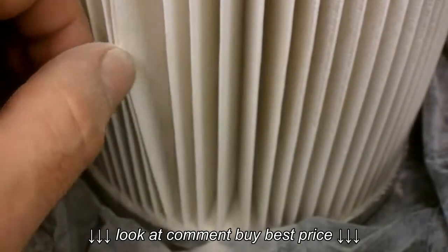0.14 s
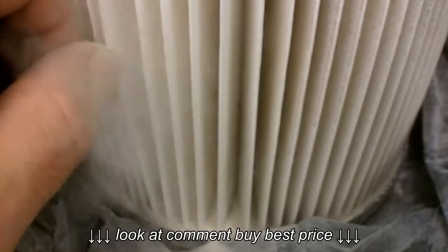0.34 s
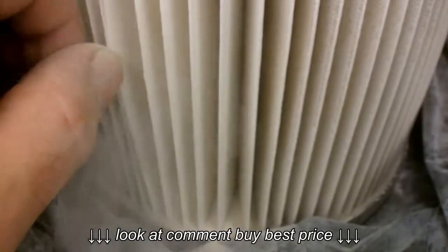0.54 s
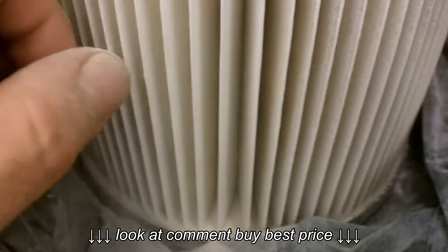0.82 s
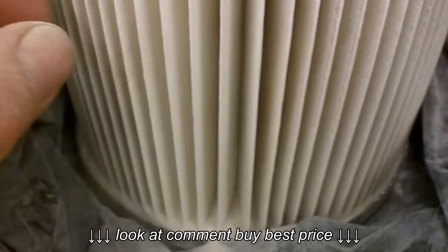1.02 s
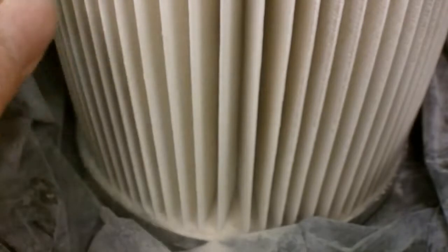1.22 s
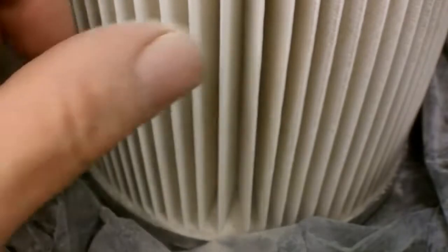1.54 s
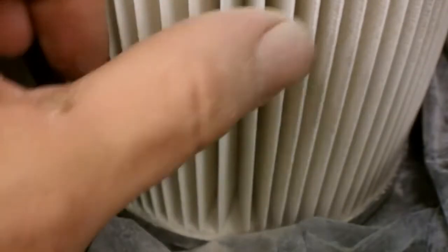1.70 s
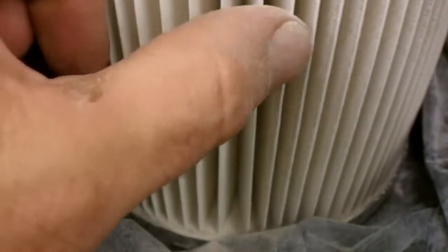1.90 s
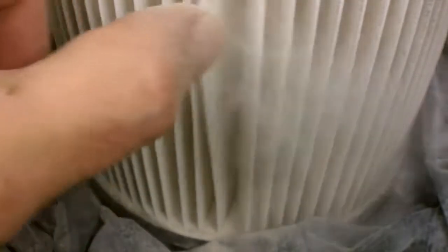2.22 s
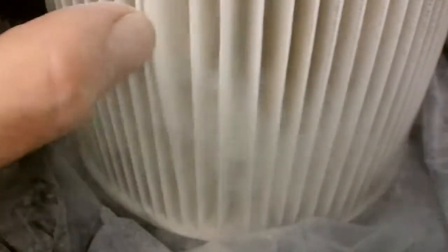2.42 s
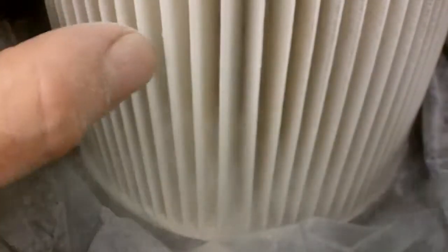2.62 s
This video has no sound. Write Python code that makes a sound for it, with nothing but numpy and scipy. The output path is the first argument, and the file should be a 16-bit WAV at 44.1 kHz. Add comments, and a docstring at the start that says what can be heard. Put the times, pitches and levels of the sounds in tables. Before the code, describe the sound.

Sharp snaps of a thumb flicking stiff filter pleats, over a faint workshop hum.

```python
"""Over a workshop's hum and air noise come a faint tick, a short rub and one loud snap.
A thumb is dragging across the stiff pleats of a dusty cartridge filter. Skin rubs and the nail
ticks on the folds, then five more snaps come in a quick run near the end. Each pleat springs free
with a crack and sets the hollow cartridge thumping. The loudest snaps clip harshly."""
import sys
import numpy as np
from scipy import signal
from scipy.fft import rfft, irfft
from scipy.io import wavfile
from scipy.ndimage import uniform_filter1d

SR = 44100
rng = np.random.default_rng(int(sys.argv[2]) if len(sys.argv) > 2 else 0)


def wav_record(signal):
    """Record a signal, one row per channel, as 16-bit PCM in the file named by sys.argv[1]."""
    frames = np.transpose(np.atleast_2d(signal))
    bounded = np.clip(frames, -1, 1)
    # unit amplitude maps onto the largest positive 16-bit level
    quanta = np.round(bounded * 32767).astype(np.int16)
    wavfile.write(sys.argv[1], SR, quanta)


N = 121275


def amp(db):
    """Turn decibels into a number to multiply by."""
    return 10 ** (np.asarray(db) / 20)


def unit_level(x):
    """Scale a signal to an average (rms) level of 1."""
    return x / np.sqrt(np.mean(x ** 2) + 1e-20)


def noise(colour, size, patchy_db=0.):
    """Noise shaped by rows of (pitch_hz, level_db); patchy_db makes it flicker."""
    real, imag, patches = rng.standard_normal((size // 128 + 6, 257, 3)).T
    patches = unit_level(uniform_filter1d(uniform_filter1d(patches, size=6, axis=0), size=12, axis=1))
    hiss = signal.istft((real + 1j * imag) * amp(patchy_db * patches), nperseg=512, noverlap=384)[1]
    hz, db = np.transpose(colour)
    curve_db = np.interp(np.log(np.fft.rfftfreq(size, 1 / SR) + 1), np.log(hz), db, -90, -120)
    return unit_level(irfft(rfft(hiss[:size]) * amp(curve_db), size))


def grit(size, pitch_hz, width_hz):
    """Noise that rings loosely around one pitch."""
    resonance = signal.iirpeak(pitch_hz, pitch_hz / width_hz, SR)
    return unit_level(signal.lfilter(*resonance, rng.standard_normal(size)))


def wander(fastest_hz):
    """A slow, random wobble."""
    t = np.arange(N) / SR
    rates_hz = np.geomspace(.3, fastest_hz, 12)
    return unit_level(sum(np.sin(2 * np.pi * (hz * t + rng.random())) / np.sqrt(hz) for hz in rates_hz))


# Faint hiss that differs between left and right: pitch_hz, level_db
STEREO_HISS = [(12, -35), (20, -2.5), (32, -15), (738, -62.5), (825, -43.5), (1330, -47.5), (16000, -67)]
def near_mono(mix, lag_samples=.18):
    """Left and right are almost alike, differing slightly in the treble and by a faint hiss."""
    side = lag_samples / 2 * np.gradient(mix) + amp(-86.5) * noise(STEREO_HISS, N)
    return mix + side * np.array([[1], [-1]])


# The rumble of air in the room: pitch_hz, level_db
ROOM_AIR = [(14, -42.5), (24, 8), (32, -4), (69, -3), (91, -22), (123, -2), (190, -16.5), (217, -9),
            (285, -13), (611, -19.5), (720, -24), (825, -21), (945, -25.5), (2960, -36.5), (16000, -71)]
# The tones of the machines: pitch_hz, level_db
MACHINE_HUM = [(118.4, -57.5), (242.2, -62.5), (339.1, -70), (818.3, -61), (1319, -79), (1637, -82),
               (1798, -81.5), (2880, -82.5)]
def workshop(waver_db=4.5):
    """Air rumbles while machines hum, wavering in loudness and slightly in pitch."""
    drifting_s = np.cumsum(1 + .0018 * wander(1.7)) / SR
    hum = np.zeros(N)
    for hz, db in MACHINE_HUM:
        peak = np.sqrt(2) * amp(db + waver_db * wander(4.5))
        hum += peak * np.sin(2 * np.pi * (hz * drifting_s + rng.random()))
    return hum + amp(-51.5) * noise(ROOM_AIR, N, patchy_db=1)


# The low, middle and high parts of the rubbing noise: pitch_hz, level_db
RUB_LOW = [(200, -23.5), (500, -7.5), (750, 1.5), (1200, -3), (2000, -30)]
RUB_MIDDLE = [(900, -33), (1500, -1.5), (2800, 4.5), (4600, -3.5), (5400, -27)]
RUB_TREBLE = [(5000, -37.5), (6200, 8.5), (8000, 1.5), (11000, -7), (16000, -30)]
# Strokes of the thumb. Here and below, a fade is the time a sound takes to drop by 60 dB.
# start_s, hold_s, fade_s, level_db, low_db, treble_db
SKIN_RUBS = [(0, 0.012, .05, -60, 4.5, -11), (.148, 0.027, .1, -55.5, 10, -14.5),
             (0.18, 0.064, .03, -47, 3.5, -17.5), (.232, .03, 0.42, -52, 8, -21.5),
             (0.638, 0.0077, .4, -66, 7, -12), (0.832, 0.12, 0.13, -64.5, -24, -6),
             (0.937, .1, .3, -61.5, -2, -11.5), (1.211, .05, .3, -71.5, 7.5, -6),
             (1.65, 0.051, .2, -70, 7, -9.5), (1.769, 0.027, .1, -65, 2, -18),
             (1.828, .04, .2, -64.5, 0, -15.5), (1.888, 0.075, .2, -69, 3, -13),
             (2.04, 0.2, .05, -53, 10, -17.5), (2.145, 0.047, .05, -55.5, 9, -11),
             (2.185, .03, .05, -36.5, -3, -22), (2.253, 0.048, .05, -45, 3, -18),
             (2.327, 0.049, .05, -51.5, 4, -14.5), (2.364, .016, .05, -47, 8.5, -9),
             (2.413, 0.015, .05, -48.5, -8, -11.5), (2.454, .04, .1, -67, -2, -9)]
def skin_rub(start_s, hold_s, fade_s, level_db, low_db, treble_db):
    """Skin catches and slips unevenly on the pleats, making a dry, grainy noise."""
    t = np.arange(SR // 2) / SR
    low, middle, high = (noise(part, len(t), patchy_db=1.5) for part in (RUB_LOW, RUB_MIDDLE, RUB_TREBLE))
    rise = np.minimum(t / (.35 * hold_s), 1)
    fade = amp(-60 * np.maximum(t - hold_s, 0) / fade_s)
    catches_db = 2 * unit_level(uniform_filter1d(rng.standard_normal(len(t)), size=180))
    friction = middle + amp(low_db) * low + amp(treble_db) * high
    return start_s, amp(level_db + catches_db) * rise * fade * friction


# The bright hiss in each tick and crack: pitch_hz, level_db
CLICK_HISS = [(1000, 16), (4000, 2.5), (7000, -8.5), (11000, -16), (15000, -38)]
# Small ticks of the nail: start_s, level_db, pitch_hz, hiss_db, fade_s
NAIL_TICKS = [(.036, -38.5, 2820, -18, 0.013), (.108, -55.5, 3020, 2.5, 0.013), (.137, -56, 3200, 0, 0.021),
              (0.254, -47, 4200, -8, 0.012), (.2645, -60, 7000, -6, 0.0097), (0.644, -48, 2920, -11, 0.045),
              (.645, -55, 1250, -22, .07), (0.75, -60.5, 2080, -16.5, 0.075),
              (0.922, -37.5, 3900, -9, 0.011), (1.0297, -31, 2200, -3.5, 0.012),
              (1.0695, -46, 2900, 5, 0.014), (1.075, -47, 1300, -5, 0.014), (2.0275, -51, 2980, 2, 0.019),
              (2.0457, -50.5, 3000, -10, 0.038), (2.153, -53, 4800, -5, .015)]
def nail_tick(start_s, level_db, pitch_hz, hiss_db, fade_s):
    """The nail clips the edge of a pleat, making a tiny burst of grit and hiss."""
    t = np.arange(4000) / SR
    burst = grit(len(t), pitch_hz, width_hz=900) + amp(hiss_db) * noise(CLICK_HISS, len(t))
    rise = np.minimum(t / .0008, 1)
    return start_s, rise * amp(level_db - 60 * t / fade_s) * burst


# Extra tones of the hollow cartridge: times_thump_pitch, level_db, fade_s
CARTRIDGE_TONES = [(0.838, -22, 0.32), (0.972, -25, .18), (1.899, -20, 0.035)]
# The tones of one pleat: times_pleat_pitch, level_db, fade_s
PLEAT_TONES = [(0.802, -14.5, 0.026), (1.002, -0.5, 0.02), (1.01, -34.5, 0.26), (1.198, -9.5, 0.041),
               (1.351, -17, 0.037), (1.701, -12, 0.027), (2.2, -14.5, 0.022), (2.702, -12, 0.02),
               (3.1, -19, .02)]
PULL_S = .001831  # how long a pleat is pulled before it lets go
def thump_and_ring(t, thump_hz, thump_fade_s, knock_db, pleat_hz, ring_db):
    """A pleat is pulled inwards and lets go: the hollow cartridge thumps and the pleat rings."""
    free_s = np.maximum(t - PULL_S, 0)
    tones = [(thump_hz, 0, thump_fade_s), (296, knock_db, .046)]  # the thump and a higher knock
    tones += [(thump_hz * ratio, db, fade_s) for ratio, db, fade_s in CARTRIDGE_TONES]
    for ratio, db, fade_s in PLEAT_TONES:
        detune = 1 + .018 * rng.standard_normal()
        tones.append((pleat_hz * ratio * detune, db + ring_db, fade_s))
    ring = np.zeros(len(t))
    for hz, db, fade_s in tones:
        phase = rng.standard_normal() * np.clip(hz / 1000 - .8, 0, np.pi)  # high tones start out of step
        swell = 1 - np.exp(-free_s / .0012) / 2 if hz > 400 else 1  # the pleat follows the cartridge
        ring -= swell * amp(db - 60 * free_s / fade_s) * np.cos(2 * np.pi * hz * (t - PULL_S) + phase)
    pull = np.sin(np.pi / 2 * np.minimum(t / PULL_S, 1)) ** 2
    bass_cut = signal.butter(3, 70, "high", fs=SR)  # deep bass is cut from the thump
    return signal.lfilter(*bass_cut, pull * ring)


# Pleats snapping free:
# release_s, level_db, thump_hz, thump_fade_s, knock_db, pleat_hz, ring_db, crack_db, crack_hz
PLEAT_SNAPS = [(.2152, 1, 185.8, .08, -15, 687.4, -0.5, -7, 2702),
               (2.1291, 0.5, 203.5, 0.057, -3.5, 633, -3.5, -14, 1600),
               (2.213, 2, 192.5, 0.053, -10.5, 587, 1.5, -10, 1484),
               (2.2975, -0.5, 195.7, .06, -16, 649.4, 4, -7.5, 2620),
               (2.3784, -2, 187.1, 0.052, -12, 600, -4.5, -15.5, 2606),
               (2.4439, -5, 199, 0.06, -21, 660, -7, -18, 2614)]
def pleat_snap(release_s, level_db, thump_hz, thump_fade_s, knock_db, pleat_hz, ring_db,
               crack_db, crack_hz):
    """A pleat springs free: a sharp crack and a dying rustle ride on top of the thump."""
    t = np.arange(SR // 2) / SR
    free_s = np.maximum(t - PULL_S, 0)
    body = thump_and_ring(t, thump_hz, thump_fade_s, knock_db, pleat_hz, ring_db)
    crunch = amp(-8) * grit(len(t), crack_hz, width_hz=540)
    ping = np.sin(2 * np.pi * (crack_hz * t + rng.random()))
    hiss = noise(CLICK_HISS, len(t)) * amp(-4.5 - 60 * free_s / .012)
    crack = (crunch + ping) * amp(-60 * free_s / .018) + hiss
    rise = np.clip((t - PULL_S) / .0012 + .5, 0, 1)
    return release_s - PULL_S, amp(level_db) * (body + rise * (amp(crack_db) * crack + snap_rustle(t)))


# The rustle that trails each snap: pitch_hz, level_db
SNAP_RUSTLE = [(300, 10.5), (700, 9), (1500, 0.5), (3000, -16), (5000, -30.5), (9000, -44.5), (16000, -54)]
def snap_rustle(t, fade_s=.17):
    """A soft, low rustle dies away after the pleat lets go."""
    return noise(SNAP_RUSTLE, len(t), patchy_db=1.5) * amp(-30 - 60 * t / fade_s)


def scene():
    """Lay every snap, tick and rub over the workshop; left and right hear nearly the same."""
    mix = workshop()
    for source, table in ((pleat_snap, PLEAT_SNAPS), (nail_tick, NAIL_TICKS), (skin_rub, SKIN_RUBS)):
        for row in table:
            start_s, sound = source(*row)
            part = mix[round(start_s * SR):][:len(sound)]
            part += sound[:len(part)]
    return near_mono(mix)


# A steady shift of the wave away from zero, left then right: share_of_full_scale
CHANNEL_OFFSET = [
    [.0194],
    [.0307],
]
def record(dry, threshold_db=-32, cut_share=.13, react_s=.025, top_hz=16400):
    """An automatic volume control dips just after each snap; the loudest clip; top treble is cut."""
    power = signal.lfilter(np.ones(400) / 400, 1, np.clip(dry[0], -1, 1) ** 2)
    fall_db = np.arange(N) * 57.5 / SR
    held_db = np.maximum.accumulate(10 * np.log10(power + 1e-12) + fall_db) - fall_db  # peaks sink slowly
    over_db = np.maximum(held_db - threshold_db, 0)
    span = round(react_s * SR)
    late_db = signal.oaconvolve(over_db, np.ones(span) / span)[:N]
    clipped = np.clip(dry / amp(cut_share * late_db) + CHANNEL_OFFSET, -1, 1)
    padded = np.pad(clipped, ((0, 0), (300, 300)), "edge")
    treble_cut = signal.firwin(511, top_hz, window=("kaiser", 9), fs=SR)
    return signal.oaconvolve(padded, treble_cut[None], "same")[:, 300:-300]


dry = scene()
out = record(dry)
wav_record(out)
```